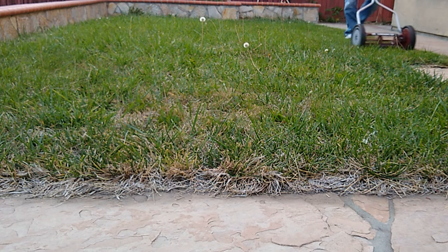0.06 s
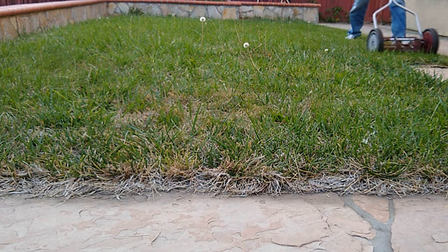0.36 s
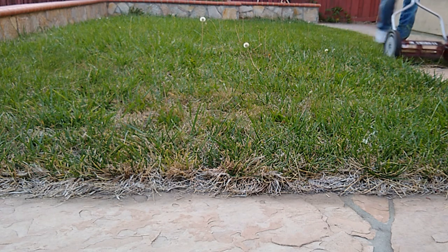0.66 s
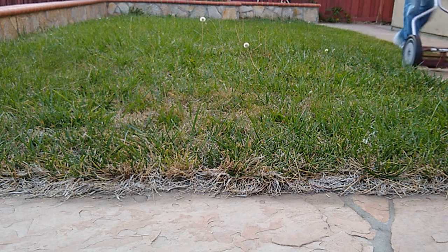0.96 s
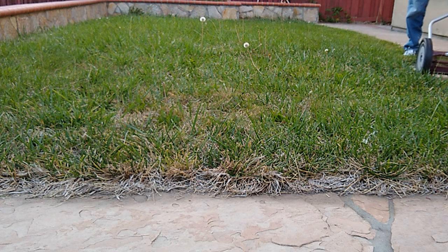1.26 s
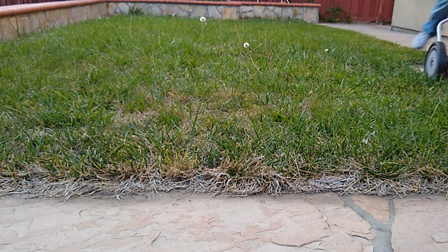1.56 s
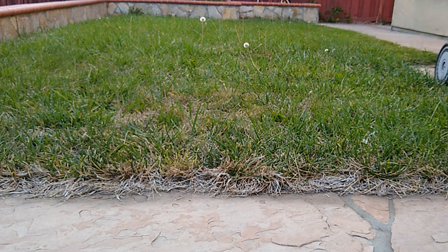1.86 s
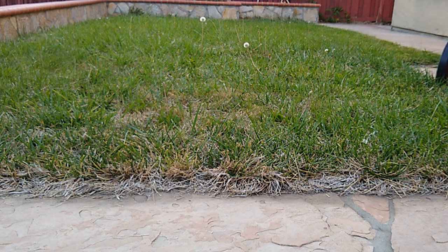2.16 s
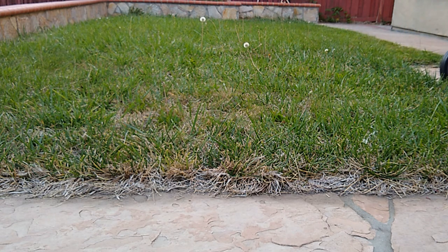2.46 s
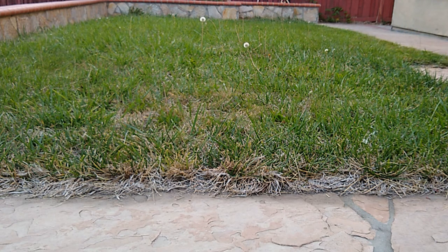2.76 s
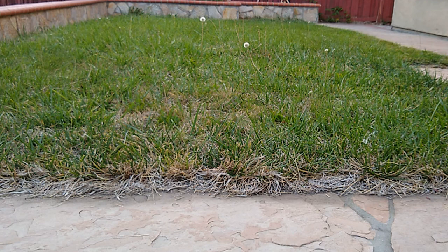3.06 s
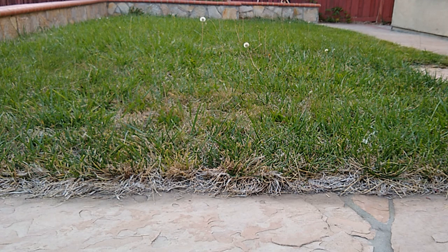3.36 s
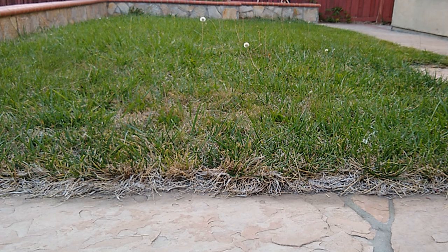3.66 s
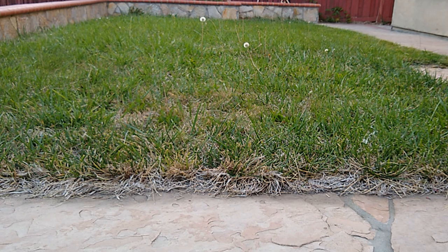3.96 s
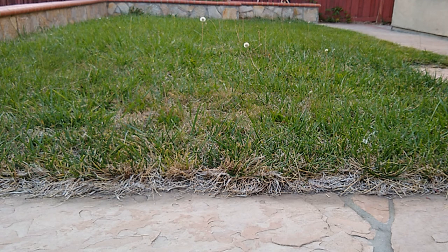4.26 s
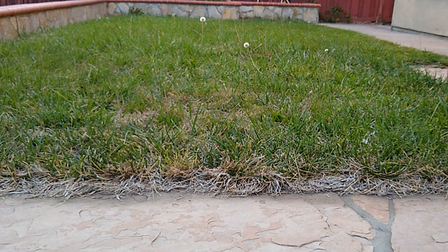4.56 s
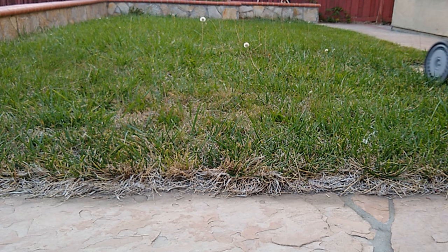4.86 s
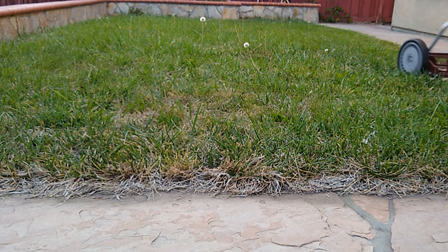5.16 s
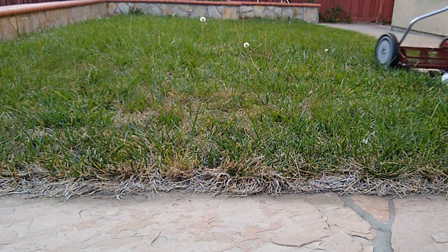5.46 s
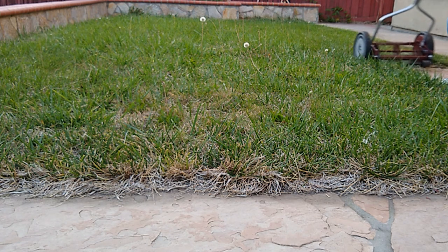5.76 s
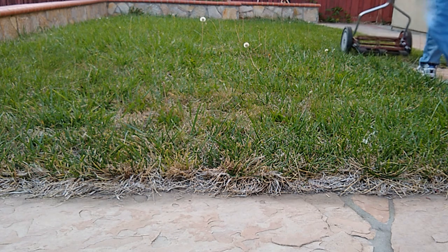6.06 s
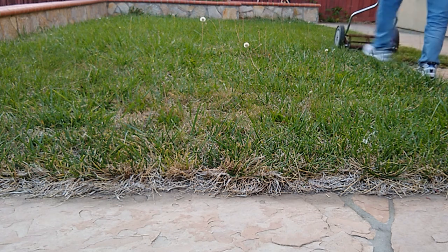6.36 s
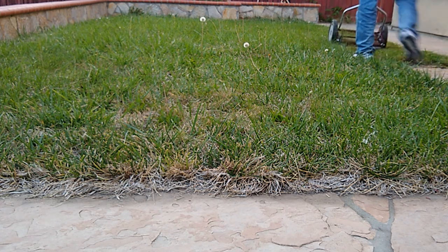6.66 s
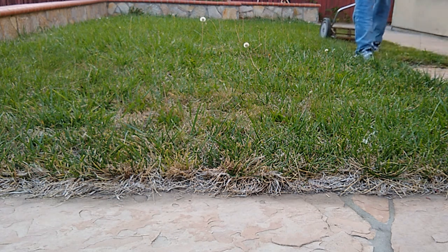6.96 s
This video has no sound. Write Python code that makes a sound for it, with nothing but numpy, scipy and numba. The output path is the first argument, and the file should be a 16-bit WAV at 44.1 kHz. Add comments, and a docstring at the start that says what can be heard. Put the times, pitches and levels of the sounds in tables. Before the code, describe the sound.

In a quiet garden, a manual mower comes up close to the microphone with a ringing swish of steel blades, clipping grass and knocking over bumps. The blades coast down in separate snips and fall still. During a short lull, loose metal parts clack and leaves rustle faintly. Then the mower is pushed off again, its scraping and hollow rattling swelling with each stride and easing slightly as it leaves.

```python
"""Reel mower on a lawn

A hand-pushed reel mower rolls up to a low microphone, stops, is turned and rolls away again.
Its spiral blades scrape the bed knife and snip the grass, faster and louder with each push.
The wheels jolt the frame, which rattles with a hollow ring. A quiet garden lies underneath."""
import sys
import numpy as np
from scipy import signal
from scipy.fft import rfft, irfft
from scipy.io import wavfile
from numba import njit

SR = 44100
rng = np.random.default_rng(int(sys.argv[2]) if len(sys.argv) > 2 else 0)


def output_pcm(signal):
    """Save a mono or channel-first signal as 16-bit PCM at the path in sys.argv[1].

    Samples are clipped to [-1, 1] before scaling.
    """
    pcm = np.clip(np.atleast_2d(signal).T, -1, 1) * 32767
    wavfile.write(sys.argv[1], SR, np.round(pcm).astype(np.int16))


N = 317504
TIME = np.arange(N) / SR
FREQ = np.maximum(np.arange(N // 2 + 1) * SR / N, 1)
KNIFE_HZ = 1119  # lowest mode of the bed knife
HOLLOW_MODE = 3  # the row of FRAME_MODES that gives the hollow ring

# resonances of the frame and wheels: pitch_hz, width_hz, gain_db
FRAME_MODES = [(181, 167, -15.5), (375.3, 108, -7.5), (477, 88, -6), (594.2, 130, 1), (780, 400, -15.5),
               (1146, 550, -16), (1857, 55, -16.5)]
# tone of steel scraping steel: freq_hz, gain_db
SCRAPE_EQ = [(500, -23), (900, -1.5), (1400, -1), (1900, 1.5), (2400, 0.5), (3200, 3.5), (4200, 2),
             (5000, -.5), (6000, -25), (7500, -24), (15000, -18.5)]
# tone of leaves being cut: freq_hz, gain_db
GRASS_EQ = [(1000, -16), (1900, 6), (3000, 10), (4700, 8.5), (5800, 12), (7200, 5), (9000, 3.5),
            (15500, 0.5)]


def undb(db):
    """Decibels to gain."""
    return 10 ** (np.asarray(db) / 20)


def unit(x):
    """Scale to rms 1."""
    return x / np.sqrt(np.mean(x ** 2))


def curve(points):
    """Join (time_s, value) points, one value a sample."""
    return np.interp(TIME, *np.transpose(points))


def over_freq(points):
    """Join (freq_hz, value) points on a log-frequency axis."""
    hz, value = np.transpose(points)
    return np.interp(np.log(FREQ), np.log(hz), value)


def colour(x, eq):
    """Minimum-phase EQ through (freq_hz, gain_db) points."""
    cepstrum = irfft(np.log(undb(over_freq(eq))), N)
    cepstrum[1:N // 2] *= 2
    cepstrum[N // 2 + 1:] = 0
    return irfft(rfft(x) * np.exp(rfft(cepstrum)), N)


def noise():
    """Two unrelated white noises."""
    return rng.standard_normal((2, N))


def drift(per_s):
    """A random wobble with a spread near 1."""
    steps = rng.standard_normal(N // 20)
    return 1.264 * np.interp(TIME * per_s, np.arange(len(steps)), steps)


def grains(per_s, spread_db):
    """Tiny random impacts, a few much stronger than the rest."""
    size = undb(spread_db * np.minimum(rng.exponential(size=N), 4))
    return unit((rng.random(N) < per_s / SR) * size * noise())


def swell(middle_s, length_s):
    """A smooth rise and fall between 0 and 1."""
    return np.cos(np.pi * np.clip((TIME - middle_s) / length_s, -.5, .5))


def burst(start_s, t60, rise_share):
    """A quick attack that dies away; longer bursts also start more softly."""
    age = np.clip((TIME - start_s) / t60, 0, 10)
    return (1 - np.exp(-age / rise_share)) * np.exp(-np.log(1000) * age)


def impulses(hits):
    """One sharp push for each (start_s, level_db) row."""
    out = np.zeros(N)
    for start_s, db in hits:
        out[int(start_s * SR)] += undb(db)
    return out


def at_peak(x, hits):
    """Scale a run of blows to peak at the level of its loudest row."""
    return x / np.abs(x).max() * undb(max(db for _, db in hits))


@njit
def resonate(x, g, k):
    """State-variable band-pass with tuning g and damping k, both free to move."""
    out, band_state, low_state = np.empty(len(x)), 0., 0.
    for i in range(len(x)):
        v = (band_state + g[i] * (x[i] + 1e-18 - low_state)) / (1 + g[i] * (g[i] + k[i]))
        band_state = 2 * v - band_state
        low_state += 2 * g[i] * v
        out[i] = k[i] * v
    return out


def band(x, hz, width_hz):
    """One resonance, steady or moving, on each channel."""
    hz = np.full(N, hz)
    return np.array([resonate(row, np.pi * hz / SR, width_hz / hz) for row in x])


def steep_band(x, hz, width_hz):
    """The same resonance twice over, for steeper skirts."""
    return band(band(x, hz, width_hz), hz, width_hz)


def steel(x, t60, shifts_per_s, wet, count=3):
    """Dense short rings of steel; their mix shifts at even loudness as contact runs along the blades."""
    age = TIME[:4096]
    out, power = x, 1
    for _ in range(count):
        ring = rng.standard_normal(len(age)) * np.exp(-np.log(1000) * age / t60)
        ring /= np.sqrt(count * np.sum(ring ** 2))
        share = wet * drift(shifts_per_s)
        out = out + share * signal.oaconvolve(x, ring[None])[:, :N]
        power = power + share ** 2 / count
    return out / np.sqrt(power)


def frame_bend(wander=0.00791):
    """The frame's pitch ratio: its ring sags under each push, rises as it eases and wanders a little."""
    # the hollow ring, rolling in: time_s, pitch_hz
    ring_in = [(0, 587), (.33, 560), (.42, 600), (.95, 574), (1.05, 604), (1.45, 592), (1.7, 562),
               (1.94, 570), (2.24, 622), (2.6, 630), (2.85, 570), (3.08, 634), (3.6, 591), (4, 680)]
    # the hollow ring, rolling away: time_s, pitch_hz
    ring_away = [(4.78, 642.5), (5.301, 585.3), (5.679, 624.6), (5.95, 561), (6.18, 644), (6.328, 572),
                 (6.597, 600), (6.72, 634.6), (6.872, 622), (6.97, 562), (7.09, 606), (7.2, 629)]
    return curve(ring_in + ring_away) / FRAME_MODES[HOLLOW_MODE][0] * (1 + wander * drift(9.8))


def frame(x, bend):
    """The frame's resonances bend together with the load; neighbours swing in opposite senses."""
    return sum((-1) ** k * undb(db) * steep_band(x, hz * bend, width_hz)
               for k, (hz, width_hz, db) in enumerate(FRAME_MODES))


def blade_contact(pass_hz, wander=0.1226, ripple=0.07):
    """The pressure ripples as each blade in turn runs along the bed knife."""
    passes = np.cumsum(pass_hz * (1 + wander * drift(6.2))) / SR
    return unit(1 + ripple * np.cos(2 * np.pi * passes))


def rattle(level_db, contact, bend):
    """Gears and wheels chatter densely into the frame, harder when it is shaken."""
    # rough ground and handling shake the frame: middle_s, length_s, level_db
    shakes = [(0.947, 0.25, -40.5), (1.238, 0.24, -34.5), (1.732, 0.18, -35.5), (2.078, 0.16, -35),
              (2.97, 0.28, -47), (3.097, 0.058, -44.5), (3.789, 0.11, -55), (3.89, 0.12, -49.5),
              (5.466, 0.17, -40), (6.161, 0.097, -39)]
    shaken = sum(undb(db) * swell(middle_s, length_s) for middle_s, length_s, db in shakes)
    knocks = grains(per_s=700, spread_db=1) + undb(-2) * noise()
    ringing = steel(knocks * contact, t60=0.15, shifts_per_s=7, wet=0.69)
    return unit(frame(ringing, bend)) * np.hypot(undb(level_db), shaken)


def hollow_ring(level_db, bend, waver_hz=16, wavers_per_s=70, throbs_per_s=65):
    """The gears keep the core of the frame's ring going, throbbing as they bind and let go."""
    waver = np.array([drift(wavers_per_s), drift(wavers_per_s)])
    hz = FRAME_MODES[HOLLOW_MODE][0] * bend + waver_hz * waver
    ring = np.sin(2 * np.pi * np.cumsum(hz, axis=1) / SR)
    return unit(ring * drift(throbs_per_s)) * undb(level_db)


def tyre_rumble(level_db):
    """The tyres roll softly over the turf."""
    return unit(steep_band(noise(), hz=105, width_hz=95)) * undb(level_db)


def reel_ring(x, slide=0.024):
    """The blades ring, sliding in pitch as the point of contact runs along the spiral."""
    # modes of the blades: pitch_hz, width_hz, gain_db
    modes = [(2980, 31, -11), (3365, 90, 0.5), (4070, 150, -8), (5130, 78, -2), (5700, 66, -4.5)]
    return sum(undb(db) * band(x, hz * (1 + slide * drift(6)), width_hz) for hz, width_hz, db in modes)


def blade_chatter(level_db, contact):
    """The blades skip on the bed knife and ring briefly."""
    skips = grains(per_s=140, spread_db=1.2) * contact
    ringing = steel(skips, t60=.012, shifts_per_s=40, wet=1)
    return unit(reel_ring(ringing)) * undb(level_db)


def knife_song(level_db, contact):
    """The bed knife sings in its lowest mode as the blades rub it."""
    rub = noise() * contact
    hz = KNIFE_HZ * (1 + 0.03 * drift(7))
    return unit(band(rub, hz, width_hz=56)) * undb(level_db)


def blade_scrape(level_db, contact, depth):
    """Steel scrapes steel in a gritty, ringing swish, with ticks where no grass lies between."""
    grit = grains(per_s=2500, spread_db=1.2) + noise()
    bare_ticks = undb(-9.5) * (1 - depth) * grains(per_s=370, spread_db=1.5)
    ringing = steel((grit + bare_ticks) * contact, t60=0.035, shifts_per_s=28, wet=1)
    return unit(colour(ringing, SCRAPE_EQ)) * undb(level_db)


def grass_snips(level_db, contact):
    """Thousands of leaves are snipped and flung as the blades close."""
    snips = (grains(per_s=3000, spread_db=3.9) + undb(4.5) * noise()) * contact
    ringing = steel(snips, t60=.02, shifts_per_s=35, wet=.55)
    return unit(colour(ringing, GRASS_EQ)) * undb(level_db)


def garden():
    """The low, slowly swelling murmur of the open air."""
    # tone of the garden air: freq_hz, gain_db
    air_eq = [(25, -30.5), (50, -13), (85, 0.5), (170, 4.5), (300, -3), (620, -3.5), (1000, -13.5),
              (2000, -17), (4000, -23.5), (8000, -32.5), (15000, -24)]
    return unit(colour(noise(), air_eq)) * undb(-66.5 + 0.53 * drift(1.6))


def jolts(bend, lag_s=0.0013, ring_boost_db=7):
    """Bumps and catching gears knock the frame, whose hollow ring hangs on."""
    # knocks through the wheels: start_s, level_db
    knocks = [(.14, -30.5), (.165, -30), (.358, -30), (0.893, -28.5), (1.087, -25.5), (1.108, -30),
              (1.159, -28.5), (1.411, -25), (1.425, -22), (1.492, -24.5), (1.51, -26.5), (1.64, -26),
              (1.749, -22), (1.773, -23.5), (1.941, -33.5), (2.017, -34), (2.068, -25), (2.082, -25.5),
              (2.465, -29), (2.578, -35.5), (2.871, -35.5), (2.996, -37), (3.071, -34.5), (3.474, -57),
              (3.779, -45), (3.852, -40), (3.96, -49), (4.465, -52), (5.276, -28), (5.492, -21),
              (5.528, -23.5), (5.622, -32), (5.664, -32), (6.143, -29), (6.368, -31.5), (6.407, -32.5),
              (6.675, -29.5), (6.699, -31), (6.713, -24), (7.063, -28), (7.096, -33.5), (7.118, -32)]
    push = impulses(knocks)
    blows = np.array([push, np.roll(push, int(lag_s * SR))])  # each also takes a second, longer path
    hz, width_hz, db = FRAME_MODES[HOLLOW_MODE]
    ring = band(band(blows, hz * bend, width_hz), hz * bend, width_hz=58)
    ring_gain = (-1) ** HOLLOW_MODE * undb(db + ring_boost_db)  # in phase with the frame's own mode
    return at_peak(frame(blows, bend) + ring_gain * ring, knocks)


def stalk_snaps():
    """Dry stalks break with a thin tick."""
    # breaking stalks: start_s, level_db
    breaks = [(0.352, -34), (1.193, -29), (1.5983, -33), (1.999, -41.5), (2.101, -36), (2.314, -45),
              (2.4404, -40), (3.39, -64), (3.5369, -65), (4.375, -62)]
    # bright tone of a snap: freq_hz, gain_db
    snap_eq = [(2000, -36), (6000, -14.5), (10000, -4), (14000, -5), (16000, 4)]
    envelope = sum(undb(db) * burst(start_s, t60=0.067, rise_share=0.0046) for start_s, db in breaks)
    return unit(colour(noise(), snap_eq)) * envelope


def glides(width_share=.12):
    """Faint, rough tones swell, slide in pitch and fade, the last as the reel coasts to rest."""
    # sliding tones: middle_s, length_s, from_hz, to_hz, level_db
    tones = [(0.898, 0.16, 138, 212, -50.5), (1.906, 1, 152, 150, -62), (3.018, 0.1, 148, 114, -64),
             (3.203, 0.2, 780, 620, -61.5)]
    out = 0
    for middle_s, length_s, from_hz, to_hz, db in tones:
        hz = np.interp(TIME, [middle_s - length_s / 2, middle_s + length_s / 2], [from_hz, to_hz])
        tone = unit(steep_band(noise()[:1], hz, width_share * hz))
        out = out + tone * undb(db) * swell(middle_s, length_s)
    return out


def thuds():
    """The weight of the mower lands on the turf."""
    # a wheel drops to the ground: start_s, level_db
    drops = [(.893, -36), (1.087, -30.5), (1.195, -24), (3.866, -43)]
    blows = np.array([impulses(drops)] * 2)
    return at_peak(steep_band(blows, hz=370, width_hz=260), drops)


def clacks(bend):
    """Loose parts strike: a bright clash, with the ring of the reel, the frame and the bed knife."""
    # metal hits metal: start_s, level_db, t60_s
    hits = [(1.195, -18, 0.031), (3.07, -39, 0.1), (3.54, -59.5, 0.036), (3.851, -47, 0.046),
            (3.871, -40.5, 0.09), (3.961, -57, 0.15), (3.984, -39, 0.03), (3.993, -32.5, 0.036),
            (3.996, -41, 0.14), (4.678, -42, 0.17)]
    strikes = noise() * sum(undb(db) * burst(start_s, t60, rise_share=.025) for start_s, db, t60 in hits)
    clash = unit(colour(strikes, SCRAPE_EQ))
    reel = unit(reel_ring(clash))
    body = unit(frame(strikes, bend))
    knife = unit(band(strikes, KNIFE_HZ, width_hz=260))
    return np.std(strikes) * (undb(-7.5) * clash + undb(-17) * reel + undb(-6) * body + undb(-9) * knife)


def coasting():
    """The free-running reel meets the bed knife in separate crisp, ringing snips."""
    # single blades touch the knife: start_s, level_db
    ticks = [(2.413, -43), (2.437, -38.5), (2.457, -41), (2.491, -38), (2.546, -38), (2.556, -39),
             (2.626, -39), (2.665, -42), (2.708, -42), (2.735, -41), (2.77, -45), (2.807, -41.5),
             (2.865, -46), (2.906, -46)]
    strikes = noise() * sum(undb(db) * burst(start_s, t60=.05, rise_share=.05) for start_s, db in ticks)
    scrape = unit(colour(strikes, SCRAPE_EQ))
    return np.std(strikes) * (unit(reel_ring(scrape)) + undb(1) * scrape)


def brushes():
    """Leaves rustle against the wheels and the idle blades as the mower is turned."""
    # sweeps through the grass: middle_s, length_s, level_db
    sweeps = [(3.572, 0.11, -75), (3.833, 0.24, -68), (3.956, 0.12, -73.5), (4.39, 0.14, -86)]
    leaves = grains(per_s=2000, spread_db=1.1)
    rustle = unit(colour(leaves, GRASS_EQ)) + undb(1) * unit(colour(leaves, SCRAPE_EQ))
    return unit(rustle) * sum(undb(db) * swell(middle_s, length_s) for middle_s, length_s, db in sweeps)


def scene():
    """Effort drives the rolling layers and grass depth sets their mix; one-shots and garden join them."""
    # the push while rolling in, 0 dB at a brisk walk: time_s, effort_db
    roll_in = [(0, -3.5), (.5, -4.5), (.9, 0), (1.25, 3.5), (1.72, 0.5), (1.97, -18), (2.36, -12.5),
               (2.46, -9), (2.6, -3.5), (2.78, -10.5), (3, -19.5), (3.17, -43), (3.4, -54.5)]
    # the push while rolling away: time_s, effort_db
    roll_away = [(4.15, -51), (4.598, -41), (4.767, -4.5), (5.15, 1.5), (5.749, -2), (6.5, -6.5),
                 (7.2, -6.5)]
    # each stride surges and bites into tufts: middle_s, length_s, extra_effort_db, extra_snip_db
    surges = [(0.176, 0.3, 1.5, 2), (0.601, 0.14, 2, 2.5), (1.138, 0.35, 4, 3), (1.667, 0.079, 3.5, 0),
              (2.11, 0.23, 12.5, 0.5), (4.364, 0.41, 12, 6.5), (4.84, 0.22, 2, 5), (5.184, 0.39, 0.95, 4),
              (5.616, 0.17, 1, 3.5), (5.962, 0.48, 5, 3), (6.345, 0.17, 2, 5), (6.646, 0.13, 4, 0.5),
              (7.068, 0.27, 3, 2.5)]
    # standing grass under the reel, thin near the path: time_s, depth (0-1)
    lawn = [(.6, 0.96), (1.8, 0.23), (2.5, 0.22), (4.8, 0.15), (6.3, 1)]
    strides_db = sum(db * swell(middle_s, length_s) for middle_s, length_s, db, _ in surges)
    tufts_db = sum(db * swell(middle_s, length_s) for middle_s, length_s, _, db in surges)
    effort_db = curve(roll_in + roll_away) + strides_db
    depth = curve(lawn)
    contact = blade_contact(pass_hz=52.7 * 2 ** (effort_db / 27))  # 27 dB of effort doubles the rate
    bend = frame_bend()
    # deep grass feeds the blades and damps the chatter and the bed knife
    rolling = (rattle(-41.5 + 0.65 * effort_db, contact, bend)
               + hollow_ring(-47 + 0.65 * effort_db + 3 * depth, bend)
               + tyre_rumble(-62.5 + 0.44 * effort_db)
               + blade_chatter(-44 + 0.98 * effort_db - 6 * depth, contact)
               + knife_song(-42 + 0.73 * effort_db - 14 * depth, contact)
               + blade_scrape(-39 + 0.98 * effort_db, contact, depth)
               + grass_snips(-51 + effort_db + 10 * depth + tufts_db, contact))
    one_shots = coasting() + jolts(bend) + thuds() + clacks(bend) + stalk_snaps() + brushes() + glides()
    return rolling + one_shots + garden()


def record(dry, comb_hz=2220, skew=0.76, top_hz=15750):
    """Two close microphone ports, in phase in the bass, swing in and out of phase higher up."""
    # how alike the ports sound: freq_hz, likeness (0-1)
    likeness = [(60, .3), (250, .6), (600, .86), (1100, .95), (1500, .7), (2100, .99), (2350, .99),
                (3300, .87), (4400, .91), (5500, .9), (6600, .8), (8000, .55), (10000, .2), (15000, .1)]
    # stereo lean: freq_hz, left_minus_right_db
    balance = [(100, 1.5), (250, 1.5), (380, 5.5), (600, 3.3), (1100, -.5), (1500, -2.5), (2200, 0),
               (3000, -2.3), (4000, 2), (5000, -.5), (6500, 2), (10000, 3), (15000, -1)]
    left, other = rfft(dry)
    phase = 2 * np.pi * np.maximum(FREQ / comb_hz, .5)
    swing = np.cos(phase) + 1j * skew * np.sin(phase) * (FREQ > comb_hz)
    shared = -over_freq(likeness) * swing
    right = shared * left + np.sqrt(1 - np.abs(shared) ** 2) * other
    lean = undb(over_freq(balance) / 2)
    ports = irfft(np.array([left * lean, right / lean]), N)
    high_cut = signal.ellip(12, .2, 80, top_hz, fs=SR, output="sos")
    return signal.sosfilt(high_cut, ports)


dry = scene()
out = record(dry)
output_pcm(out)
```